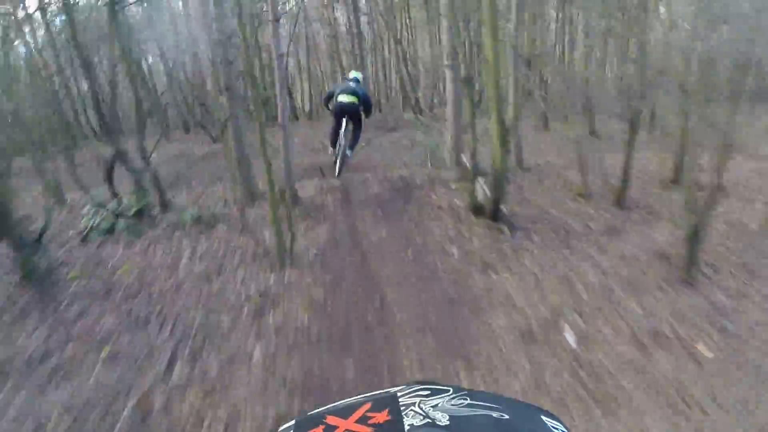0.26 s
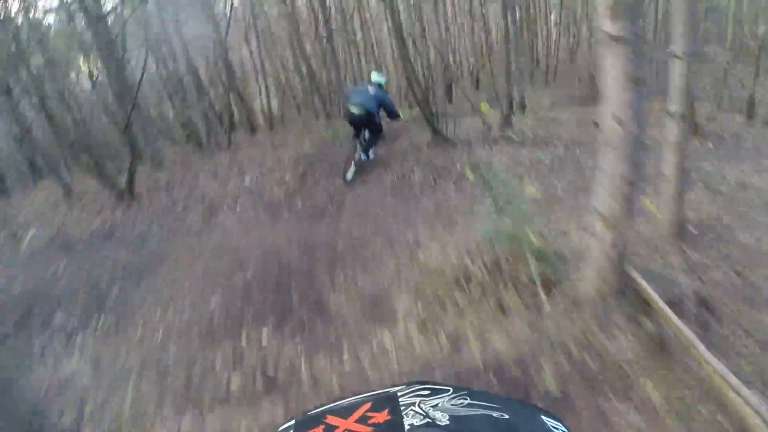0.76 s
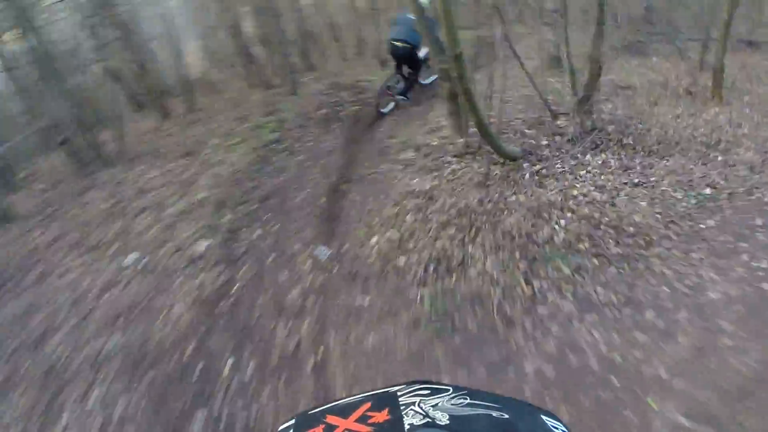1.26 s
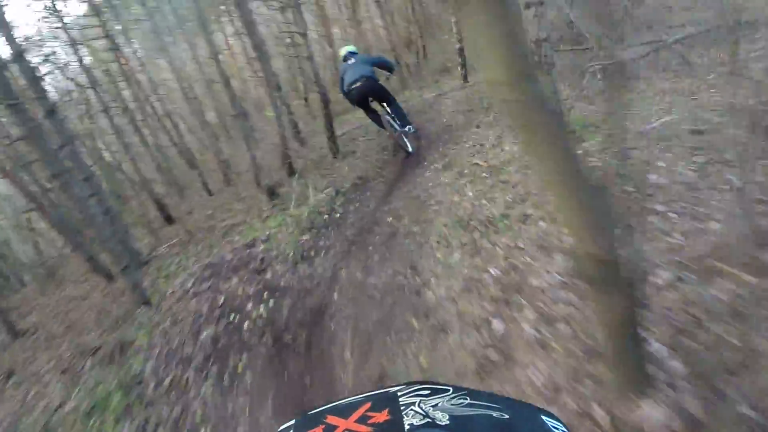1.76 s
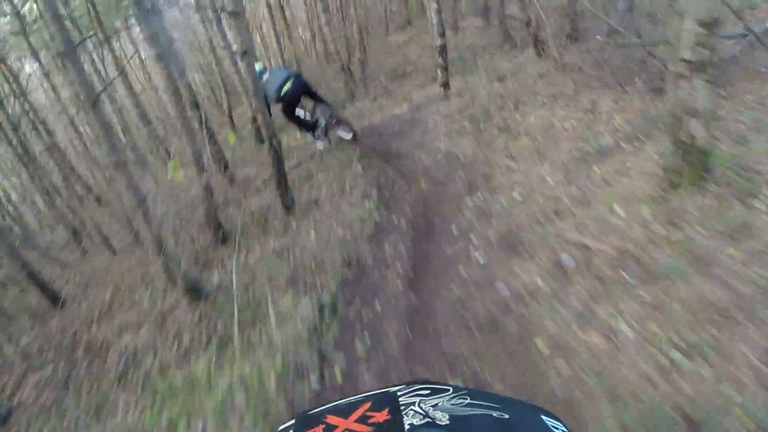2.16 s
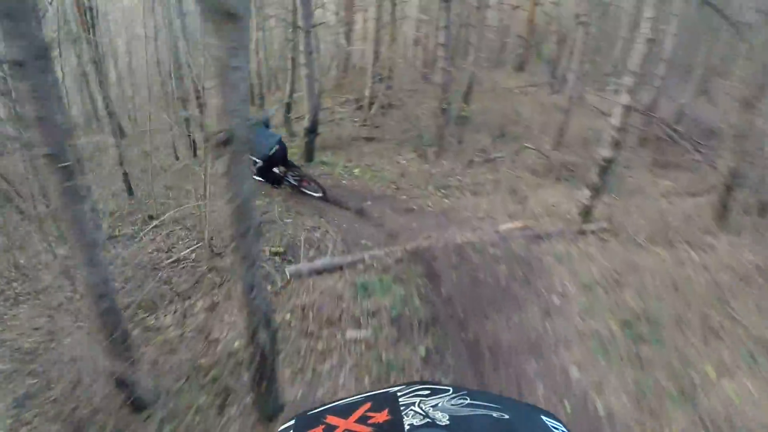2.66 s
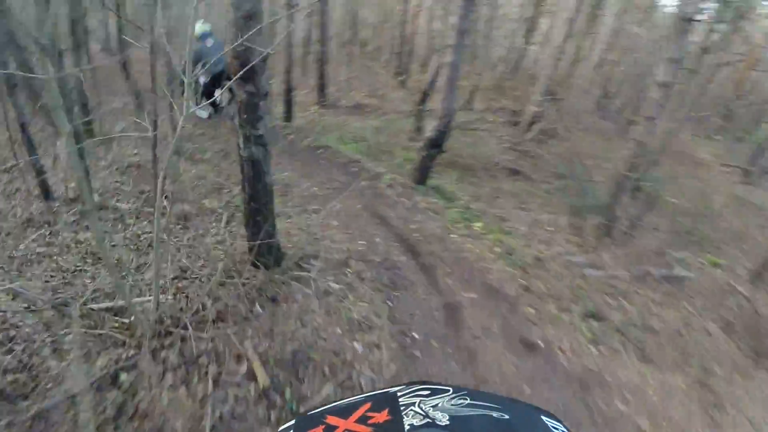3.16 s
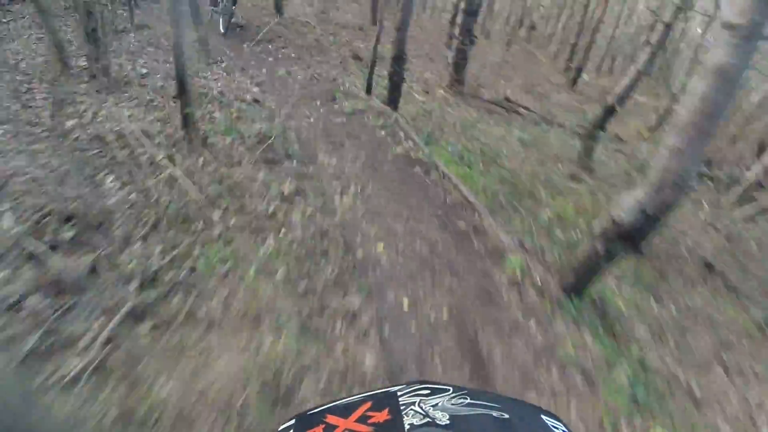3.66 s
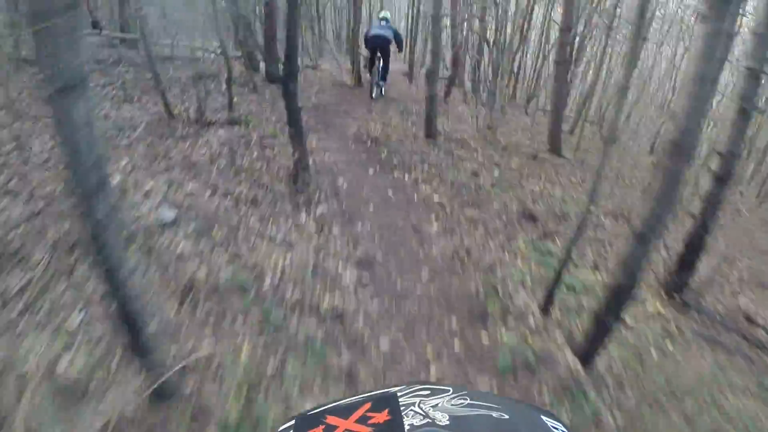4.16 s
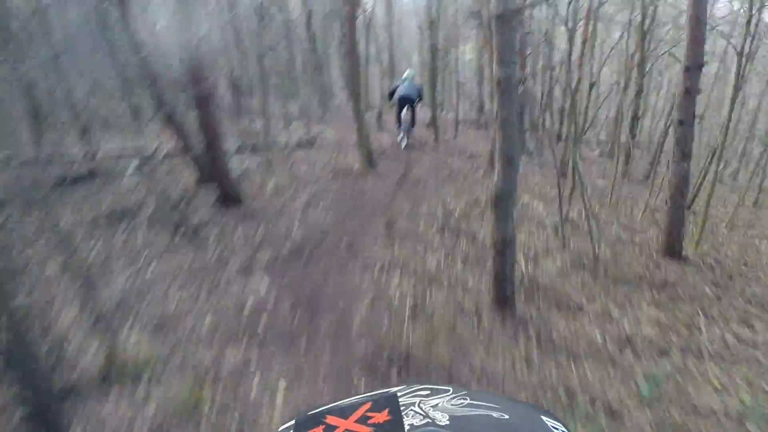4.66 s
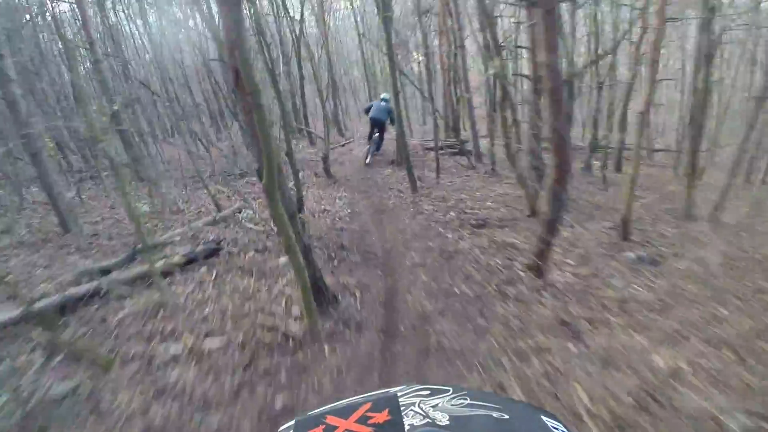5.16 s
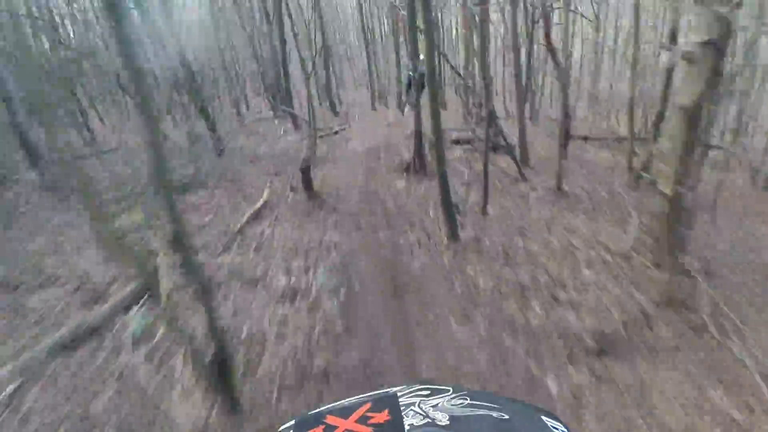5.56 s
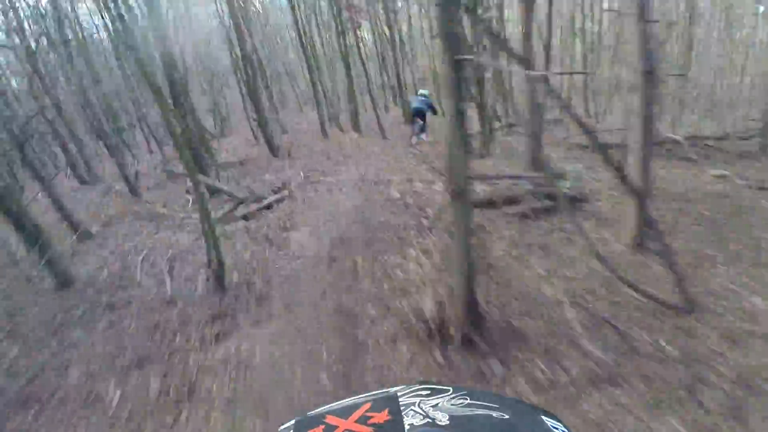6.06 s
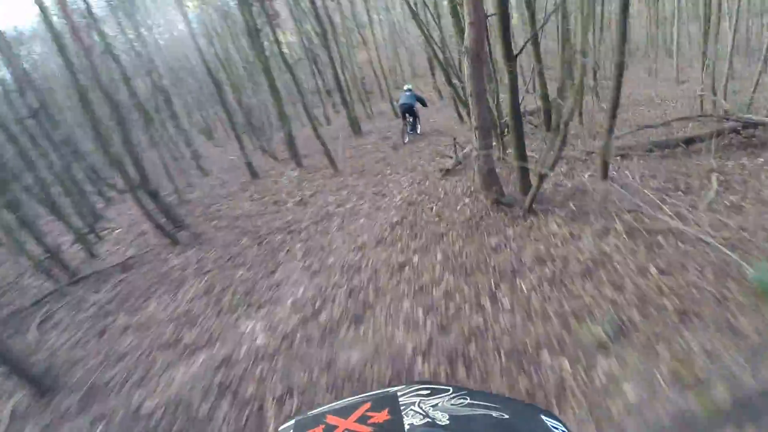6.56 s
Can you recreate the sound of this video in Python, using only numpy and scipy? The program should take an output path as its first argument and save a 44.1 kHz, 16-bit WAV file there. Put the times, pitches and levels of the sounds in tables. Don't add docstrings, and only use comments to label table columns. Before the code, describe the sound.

Close, boxy sound inside a small sealed case on a cyclist's helmet, riding fast through woods. From 0 s, resonant midrange wind hiss flutters over gritty tyre roll, with low bumps and crunching leaves and clods around 0.4-0.6 s. At about 1.25 s there is a brief strong swell with a jolt and crackle. From 1.5 to 4.2 s the wind drops through bends, exposing tyre crunch, low thumps, chain and cable rattles and thin pings; a busier clatter comes at 3.6-3.9 s and a bright metallic rattle with a dirt hit at 4.26-4.33 s. Wind rises again; at 4.77 s a sharp double twig slap hits the visor. Hiss grows strong and steady until 6.3 s. At 6.37 s a very loud, hard cluster of plastic cracks bursts out with a low boom and short ring. Everything then sounds ducked and quieter to 6.8 s, with one dull knock.

```python
import sys
import numpy as np
from scipy import signal
from scipy.fft import rfft, irfft
from scipy.io import wavfile
from scipy.ndimage import uniform_filter1d

SR = 44100
rng = np.random.default_rng(int(sys.argv[2]) if len(sys.argv) > 2 else 0)


def store_pcm(level_fs):
    pcm = np.round(np.clip(level_fs, -1, 1) * 32767).astype(np.int16)
    wavfile.write(sys.argv[1], SR, np.atleast_2d(pcm).T)


def magnitude_from_level(level_db):
    exponent = np.asarray(level_db, float) / 20
    return 10 ** exponent


N = 300318


def evened(x):
    return x / np.sqrt(np.mean(x ** 2) + 1e-20)


def add(mix, start_s, sound):
    part = mix[round(start_s * SR):][:len(sound)]
    part += sound[:len(part)]


def curve(points, t):
    return np.interp(t, *np.transpose(points))


def read(points, hz):
    f, value = np.transpose(points)
    return np.interp(np.log(hz + 1), np.log(f + 1), value)


# pitch_hz, width_hz, change_db
CASE_HOLLOWS = [(635, 50, 0), (1102, 62, -5), (1296.5, 36, 6), (1480, 76, 1.5), (1760, 77, 1),
                (2220, 180, 1.5), (2630, 69, 0.5), (3130, 81, 1.5), (3960, 89, 5), (4640, 150, 2.5),
                (5580, 300, 0), (9400, 200, 1)]


def coloured(x, points):
    hz = np.fft.rfftfreq(len(x), 1 / SR)
    hollow_db = sum(db / (1 + (2 * (hz - f) / width) ** 2) for f, width, db in CASE_HOLLOWS)
    return evened(irfft(rfft(x) * magnitude_from_level(read(points, hz) + hollow_db), len(x)))


def flicker(length_s, depth_db):
    wobble = uniform_filter1d(rng.standard_normal(N), size=round(length_s * SR))
    wobble = uniform_filter1d(wobble, size=200)
    return magnitude_from_level(depth_db * evened(wobble))


def patchy(depth_db):
    frames = N // 128 + 5
    a, b, patches = rng.standard_normal((frames, 257, 3)).T
    patches = uniform_filter1d(patches, size=8, axis=0)
    patches = evened(uniform_filter1d(patches, size=14, axis=1))
    spectrum = (a + 1j * b) * magnitude_from_level(depth_db * patches)
    return evened(signal.istft(spectrum, nperseg=512, noverlap=384)[1][:N])


def steadied(x, share):
    envelope = np.sqrt(uniform_filter1d(x ** 2, size=3000) + 0.058)
    return evened(x / envelope ** share)


def modes(table):
    t = np.arange(SR // 2) / SR
    ring = np.zeros(len(t))
    for k, (hz, db, t60) in enumerate(table):
        ring += (-1) ** k * magnitude_from_level(db - 60 * t / t60) * np.sin(2 * np.pi * hz * t)
    return ring


def ticks(table, snap_hz, spread):
    out, t = np.zeros(N), np.arange(16000) / SR
    snap_shorter = 0.74
    noise = rng.standard_normal((len(table), 2, 16000))
    wide = signal.butter(3, [snap_hz, 2.45 * snap_hz], "band", fs=SR, output="sos")
    for (start_s, db, hz, t60, snap_share), (a, b) in zip(table, noise):
        narrow = signal.butter(2, [hz * (1 - spread), hz * (1 + spread)], "band", fs=SR, output="sos")
        ring = evened(signal.sosfilt(narrow, a))
        snap = evened(signal.sosfilt(wide, b)) * magnitude_from_level(1.5 - 60 * t / t60 * (1 / snap_shorter - 1))
        burst = (1 - snap_share) * ring + snap_share * snap
        onset = np.minimum(t / 0.0014, 1)
        add(out, start_s, magnitude_from_level(db - 6.5 - 60 * t / t60) * burst * onset)
    return out


# middle_s, change_db, half_length_s
SWINGS = [(0.28, -1, 0.029), (0.392, 3.5, 0.054), (0.533, -3, 0.081), (0.604, 4.5, 0.02),
          (0.79, -2.5, 0.041), (1.19, 0, 0.034), (1.262, 11, 0.047), (1.53, -5.5, 0.069),
          (2.41, -5.5, 0.071), (3.178, -8, 0.088), (3.497, 0, .04), (4.252, -4, 0.037), (4.915, -3, 0.02),
          (5.57, -4, 0.056), (5.765, 1, 0.034), (6.33, -5.5, 0.024), (6.442, -6.5, 0.055), (6.568, -2, 0.1)]


def swings(t):
    return sum(db * np.exp(-((t - s) / half) ** 2) for s, db, half in SWINGS)


# pitch_hz, level_db per Hz
AIR_SPECTRUM = [(180, -40.5), (300, -4.5), (863, -8), (1280, -6), (2250, -6.5), (3940, -20), (5950, -22.5),
                (15500, -32.5)]


def air(t):
    hiss = magnitude_from_level(-57) * coloured(patchy(0.87), AIR_SPECTRUM)
    whine_hz, whine_db = 13950, -85.5
    whine = magnitude_from_level(whine_db) * flicker(0.063, 3.0) * np.sin(2 * np.pi * whine_hz * t)
    return hiss + whine


# start_s, level_db, pitch_hz, t60_s (time to fade 60 dB), snap_share 0-1
PINGS = [(0.7537, -57, 7640, 0.08, 0.1), (1.9225, -56, 7860, 0.17, 0.7), (1.9824, -55, 9100, 0.08, 0.1),
         (2.1136, -56, 7550, 0.03, 0.8), (2.143, -56, 8960, 0.08, 0.1), (2.2283, -52, 9400, 0.08, 0),
         (2.3605, -51, 7980, 0.03, 0.8), (3.5094, -54.5, 9260, 0.08, 0.1), (4.2714, -46, 7430, 0.08, 0.4),
         (0.8335, -52, 6610, 0.046, 0.1), (0.9038, -42, 6230, 0.038, 0.1), (1.3004, -41, 6230, 0.039, 0.24),
         (1.3843, -51, 6500, 0.046, 0), (4.6224, -45, 6490, 0.05, 0.3)]


def spoke_pings():
    return ticks(PINGS, snap_hz=4500, spread=0.045)


# start_s, level_db, pitch_hz, t60_s, snap_share 0-1
CHAIN_SNAPS = [(1.473, -62, 11000, .03, .8), (1.686, -54, 11000, .03, 0.89), (1.923, -62, 11000, .03, .8),
               (1.984, -62, 11000, .03, .8), (2.006, -62, 11000, .03, .8), (2.23, -62, 11000, .03, .8),
               (2.266, -60, 11000, .03, .8), (3.857, -57.5, 11000, .03, .8), (4.087, -57, 11000, 0.027, .8),
               (4.2607, -55, 11000, .03, .8), (4.3335, -61, 11000, .03, .8)]


def chain_snaps():
    return ticks(CHAIN_SNAPS, snap_hz=6000, spread=0.2)


# start_s, level_db, pitch_hz
RATTLES = [(0.5766, -42, 5540), (1.2146, -48, 4700), (1.2401, -44, 5700), (1.434, -43, 4640),
           (1.4721, -42.5, 5440), (1.5564, -43, 4520), (1.5868, -37.5, 4670), (1.6856, -40.5, 5500),
           (1.8657, -46, 4430), (1.984, -45, 5830), (2.006, -42, 6100), (2.2658, -33.5, 4500),
           (2.2894, -50, 4680), (2.3281, -43, 4720), (2.4723, -41, 4650), (2.748, -42, 4660),
           (2.8584, -44, 4510), (3.5894, -43, 4220), (3.618, -38.5, 4670), (3.7885, -45, 4700),
           (3.857, -36.5, 5500), (3.872, -34.5, 4650), (4.0352, -41, 4640), (4.087, -38, 4620),
           (4.173, -44.5, 4690), (4.261, -30.5, 5800), (4.332, -37, 4210), (5.1332, -47, 5170),
           (5.3294, -41, 5500), (6.7094, -52, 4620)]


def rattles():
    t60_s, snap_share = 0.039, 0.3
    return ticks([row + (t60_s, snap_share) for row in RATTLES], snap_hz=3800, spread=0.078)


# start_s, level_db, pitch_hz, t60_s, snap_share 0-1
PAD_RUBS = [
    (2.48, -45, 2220, 1.0, 0),
    (3.93, -46, 2230, 1.0, 0),
]


def pad_rubs():
    return ticks(PAD_RUBS, snap_hz=1230, spread=0.046)


# start_s, level_db, pitch_hz, t60_s, snap_share 0-1
MORE_CLODS = [(.36, -28, 1500, .1, 0.66), (.40, -30, 1350, .1, 0.68), (1.24, -32, 2590, 0.091, .6),
              (1.27, -34, 2200, .08, .6), (1.375, -35, 3200, .06, .5), (1.598, -35, 2420, 0.061, 0.37),
              (2.281, -35, 1290, .05, .4), (2.328, -41, 2300, 0.057, .4), (2.396, -43, 2500, .05, .3),
              (2.482, -42, 1300, .2, .2), (3.0026, -40, 2300, .05, 0.46), (3.0994, -41, 2300, .05, .5),
              (3.8227, -37, 2200, .07, .3), (5.133, -36, 1700, .06, .6)]


def more_clods():
    return ticks(MORE_CLODS, snap_hz=1260, spread=0.1)


# start_s, level_db, pitch_hz, t60_s, snap_share 0-1
CLODS = [(0.3187, -47, 1530, 0.047, 0.2), (0.5736, -24.5, 1330, 0.081, 0.42),
         (1.086, -29, 1280, 0.093, 0.36), (1.1862, -35, 1560, 0.06, 0.1), (1.2482, -27, 1370, 0.13, 0.06),
         (1.4967, -29, 2060, 0.11, 0.4), (1.571, -35, 1340, 0.065, 0.53), (1.6714, -34, 1590, 0.079, 0.03),
         (2.2834, -34, 2320, 0.031, 0.5), (2.8685, -34.5, 1600, 0.055, 0.5), (3.5671, -37, 2180, 0.25, 0.5),
         (4.0257, -33, 2260, 0.061, 0.34), (4.334, -23, 2220, 0.035, 0.45)]
# start_s, level_db, pitch_hz, t60_s, snap_share 0-1
DULL_KNOCKS = [
    (3.786, -36, 630, 0.068, 0),
    (3.854, -27.5, 650, 0.049, 0),
]


def clods_and_taps():
    return ticks(CLODS + DULL_KNOCKS, snap_hz=1270, spread=0.078)


# pitch_hz, level_db per Hz
TYRE_SPECTRUM = [(240, -31), (400, -10), (519, -21.5), (577, -12), (749, -9), (900, -14), (1320, -11),
                 (1710, -3.5), (1880, -9), (2250, -1.5), (3850, -20.5), (4560, -13.5), (5070, -19.5),
                 (5820, -16.5), (15500, -50.5)]
# time_s, level_db
TYRE_LOAD = [(0, -54.5), (0.3, -60.5), (0.95, -61), (1.3, -70), (1.6, -58.5), (2.0, -62.5), (2.5, -58.5),
             (2.7, -70), (3.0, -62.5), (3.3, -65.5), (3.6, -70.5), (3.87, -60.5), (4.4, -63), (4.65, -61),
             (5.75, -57), (6.3, -56.5), (6.58, -64.5), (6.72, -54)]


def tyres(t):
    grain_size = magnitude_from_level(3.9 * np.minimum(rng.exponential(1, N), 5))
    grain_hits = rng.random(N) < 1500 / SR
    grit = grain_size * grain_hits * rng.standard_normal(N)
    roll = patchy(1.03) * flicker(0.028, 2.7) + 0.42 * evened(grit)
    level_db = curve(TYRE_LOAD, t) + 0.84 * swings(t) + 9.5
    return magnitude_from_level(level_db) * coloured(roll, TYRE_SPECTRUM)


# middle_s, shake_db, half_length_s, mount_hum_db
JOLTS = [(0.0, -35, 0.092, -48), (0.45, -24.5, 0.03, -37), (0.59, -28.5, 0.062, -43),
         (0.794, -27, 0.034, -43.5), (1.02, -32, 0.04, -46), (1.294, -20, 0.039, -45),
         (1.551, -22, 0.021, -48), (1.728, -20.5, 0.035, -45), (2.108, -30.5, 0.075, -46.5),
         (2.21, -26, 0.015, -50), (2.323, -28.5, 0.06, -49), (2.56, -30.5, 0.018, -43.5),
         (2.776, -35, 0.012, -67), (2.897, -39, 0.015, -59), (3.07, -34.5, 0.017, -66),
         (3.241, -28.5, 0.014, -55), (3.399, -34.5, 0.04, -48), (3.66, -17, 0.033, -42),
         (3.854, -20.5, 0.066, -41.5), (4.048, -26, 0.05, -45.5), (4.315, -28.5, 0.013, -66),
         (4.403, -29, 0.024, -62), (4.752, -28, 0.018, -48), (5.323, -35.5, 0.12, -61),
         (5.518, -30.5, 0.061, -43), (5.726, -19.5, 0.013, -56), (5.903, -28.5, 0.026, -48),
         (6.245, -22.5, 0.04, -37.5), (6.622, -34.5, 0.041, -59), (6.8, -26, 0.07, -40.5)]


def jolts(t):
    shake = hum = 0
    for middle_s, shake_db, half_s, hum_db in JOLTS:
        bell = np.exp(-abs((t - middle_s) / half_s) ** 1.06)
        shake = shake + magnitude_from_level(shake_db) ** 2 * bell
        hum = hum + magnitude_from_level(hum_db) ** 2 * bell
    return shake, hum


# pitch_hz, level_db per Hz
SHAKE_SPECTRUM = [(3.5, -38.5), (6.0, 1), (16, 5.5), (27, 2), (41, -8.5), (59, -27), (70, -12), (91, -35.5),
                  (150, -120)]
# pitch_hz, level_db per Hz
MOUNT_SPECTRUM = [(29, -38), (50, 1.5), (59, -4.5), (76, 0.5), (92, 4.5), (150, -15), (187, -10),
                  (210, -14), (252, -6.5), (357, -25.5), (500, -30), (650, -37.5), (1100, -120)]
# hum_db in a -45 dB headwind, wind_share in dB per dB, jolt_change_db
MOUNT_BENDING = [
    (-48, 0.42, 0.5),
    (-51, 0.52, -13.5),
]


def helmet(t):
    shake = steadied(coloured(rng.standard_normal(N), SHAKE_SPECTRUM), 0.83)
    hum = coloured(rng.standard_normal(N) * flicker(0.035, 2.86), MOUNT_SPECTRUM)
    split = signal.butter(4, 130, fs=SR, output="sos")
    low = signal.sosfiltfilt(split, hum)
    shake_power, hum_power = jolts(t)
    wind_db = curve(HEADWIND, t) + 0.78 * swings(t) + 45
    calm_shake_db = -40
    out = np.sqrt(magnitude_from_level(calm_shake_db) ** 2 + shake_power) * shake
    for part, (hum_db, wind_share, jolt_db) in zip((low, hum - low), MOUNT_BENDING):
        wind_power = magnitude_from_level(hum_db + wind_share * wind_db) ** 2
        level = np.sqrt(wind_power + magnitude_from_level(jolt_db) ** 2 * hum_power)
        out += level * steadied(evened(part), 0.41)
    return out


# pitch_hz, level_db, t60_s
MOUNT_TONES = [(89, 0.5, 0.085), (246, 6, 0.044), (148, -1.5, 0.033), (324, -8, 0.0098)]


def knocks(table, body, side):
    out, shell = np.zeros(N), modes(body)
    mount = signal.fftconvolve(modes(MOUNT_TONES), signal.windows.hann(90))
    chatter = rng.standard_normal((len(table), 1000))
    t = np.arange(1000) / SR
    for (start_s, ring_db, push_db, top_hz, contact_s), noise in zip(table, chatter):
        scrape = noise * np.sin(np.pi * np.clip(t / contact_s, 0, 1) ** 0.45)
        scrape /= np.linalg.norm(scrape)
        scrape_share = np.clip(0.15 + 28 * contact_s + 0.042 * top_hz / 1000, 0, 1)
        force = (1 - scrape_share) * (t == 0) + scrape_share * scrape
        softness = signal.butter(5, top_hz, fs=SR, output="sos")
        ring = signal.sosfilt(softness, signal.fftconvolve(force, shell))
        add(out, start_s, side * magnitude_from_level(ring_db) * ring / abs(ring).max())
        add(out, start_s, magnitude_from_level(push_db) * mount / abs(mount).max())
    return out


# pitch_hz, level_db, t60_s
VISOR_TONES = [(514, -17, 0.016), (665, -15.5, .02), (957, -6.5, 0.014), (1280, -3, 0.011),
               (1545, 0.5, 0.014), (1840, -2, .011), (2160, -7.5, 0.017), (2570, -8, 0.014),
               (2870, -25, .015)]
# start_s, ring_db, mount_push_db, hardness as top_hz, contact_s
VISOR_SLAPS = [
    (1.291, -32, -21, 1100, 0.013),
    (3.852, -31, -60, 3000, 0.0023),
    (3.789, -33, -50, 3000, .002),
    (3.853, -41, -52, 770, .002),
    (1.292, -35, -50, 750, 0.0017),
    (4.7721, -3, -9.5, 2800, 0.0003),
    (4.7734, -5.5, -38, 2770, 0.00033),
    (4.7765, -21, -41, 2400, .001),
]


def visor_slaps():
    return knocks(VISOR_SLAPS, VISOR_TONES, side=0.99)


# pitch_hz, level_db, t60_s
CASE_TONES = [(560, -21.5, 0.025), (780, -13, 0.023), (990, -12.5, 0.011), (1215, -8.5, 0.022),
              (1330, -5.5, 0.011), (1460, -4, 0.022), (1730, -0.5, 0.011), (2060, -4, 0.016),
              (2235, 5.5, 0.013), (2450, 9, 0.0033), (2915, -2, 0.016), (3330, -15, 0.01),
              (3740, -6, 0.011), (4300, -11, 0.011), (4950, -7, 0.0085), (5280, -11, 0.014),
              (5770, 1, 0.0073), (6620, -2, 0.007), (7020, -13.5, 0.0055), (7820, -4, 0.0058),
              (8700, -6.5, 0.0066), (9900, -9.5, .003), (10900, -10, 0.003), (11900, -13.5, .003),
              (13500, -18, .004), (15000, -26, .003)]
# start_s, ring_db, mount_push_db, hardness as top_hz, contact_s
CASE_KNOCKS = [(2.198, -60, -43, 600, .004), (3.326, -62, -42, 600, .004), (3.644, -57, -40, 600, .004),
               (3.773, -60, -35.5, 600, 0.0045), (3.782, -48, -48, 900, 0.01),
               (3.789, -35.5, -37, 3460, 0.025), (3.852, -30, -36, 3400, 0.0042),
               (3.874, -36, -49, 3000, 0.0033), (6.273, -22, -18, 1680, 0.0044),
               (6.3708, 5, -23.5, 5500, 0.003), (6.3712, -8, -40.5, 13000, .002),
               (6.3727, 15, -1, 3330, 0.0037), (6.3762, 1, -30, 12060, 0.0018),
               (6.3782, 13.5, -19, 5000, 0.003), (6.3786, -0.5, -30.5, 15000, .0015),
               (6.3824, 3.5, -19, 3800, 0.0022), (6.385, 14, -14.5, 12940, 0.0043),
               (6.39, -4, -33, 3460, 0.0023), (6.7743, -25, -17.5, 1500, 0.00084)]


def case_knocks():
    return knocks(CASE_KNOCKS, CASE_TONES, side=-1.046)


# start_s, level_db, pitch_hz, t60_s, snap_share 0-1
FOAM_BOOMS = [
    (6.374, -13, 639, .07, 0),
    (6.39, -32.5, 603, .2, 0),
]


def foam_boom():
    return ticks(FOAM_BOOMS, snap_hz=300, spread=0.36)


# pitch_hz, level_db, t60_s
HELMET_TONES = [(86, -22, .35), (242, -29, .6), (361, -45, .4), (468, -41, .24), (635, -32, .2),
                (807, -40, .12), (926, -38, .16)]


def helmet_ring():
    out = np.zeros(N)
    add(out, 6.388, modes(HELMET_TONES))
    return out


# pitch_hz, level_db per Hz
WIND_SPECTRUM = [(240, -28.5), (400, -19), (873, -18.5), (1050, -13.5), (1320, -1), (1660, -4),
                 (2400, -10.5), (2630, -6.5), (2970, -12.5), (3410, -10.5), (4090, -34.5), (5560, -23.5),
                 (6990, -48), (12700, -83), (15500, -72)]
# time_s, level_db
HEADWIND = [(0, -38.5), (0.42, -39.5), (0.7, -42), (0.92, -47), (1.4, -50), (1.55, -53.5), (1.75, -50),
            (2.2, -64), (2.6, -59.5), (3.0, -54.5), (3.4, -58.5), (4.2, -58.5), (4.4, -51), (4.85, -42.5),
            (5.3, -39), (5.75, -36.5), (6.25, -37), (6.81, -47)]


def wind(t):
    swirls = patchy(1.32) * flicker(0.012, 1.01) * flicker(0.06, 0.6)
    level_db = curve(HEADWIND, t) + swings(t) + 2.0
    return magnitude_from_level(level_db) * coloured(swirls, WIND_SPECTRUM)


def scene():
    t = np.arange(N) / SR
    bike = spoke_pings() + chain_snaps() + rattles() + pad_rubs()
    ground = more_clods() + clods_and_taps() + tyres(t)
    blows = visor_slaps() + case_knocks() + foam_boom() + helmet_ring()
    mix = air(t) + bike + ground + helmet(t) + blows + wind(t)
    return mix[None]


def roll_off(x):
    return signal.sosfilt(signal.butter(12, 15290, fs=SR, output="sos"), x)


# time_s, gain_db
DUCKING = [
    (6.3627, 2),
    (6.362, -15),
    (6.42, -10),
    (6.81, -10),
]


def record(dry):
    ducked = dry * magnitude_from_level(curve(DUCKING, np.arange(N) / SR))
    limited = np.tanh(ducked / 2.348) * 2.06
    treble_cut = signal.firwin(511, 15600, window=("kaiser", 9), fs=SR)
    finished = signal.oaconvolve(limited, treble_cut[None], "same")
    return roll_off(finished)


dry = scene()
out = record(dry)
store_pcm(out)
```